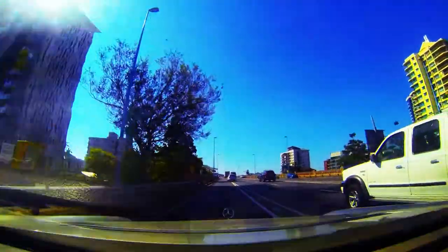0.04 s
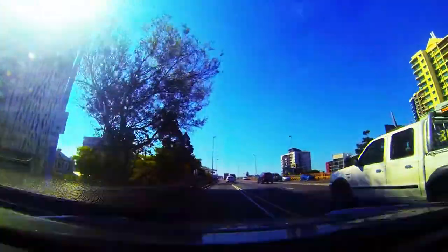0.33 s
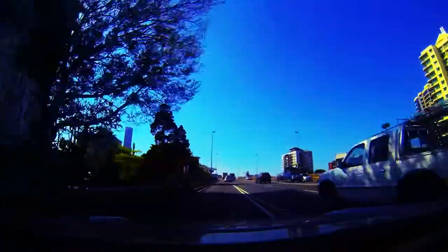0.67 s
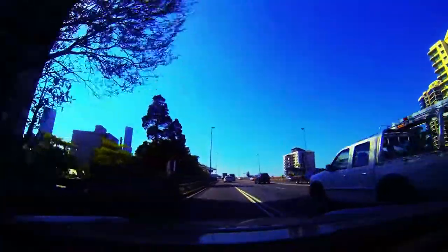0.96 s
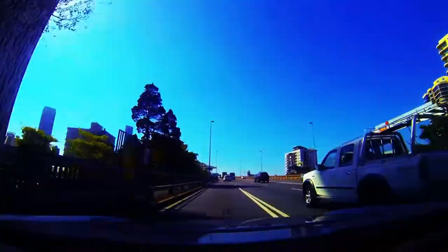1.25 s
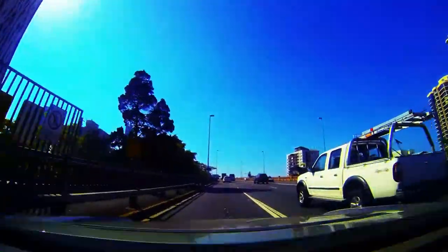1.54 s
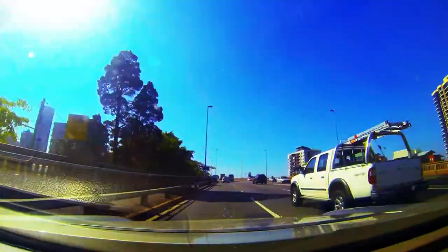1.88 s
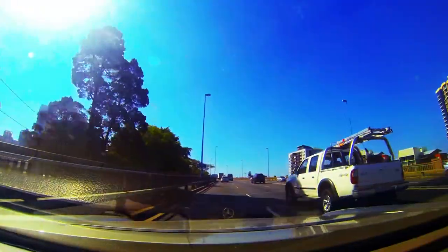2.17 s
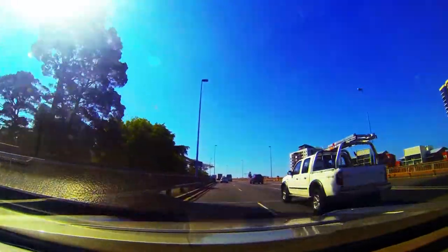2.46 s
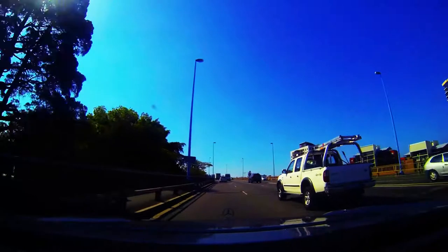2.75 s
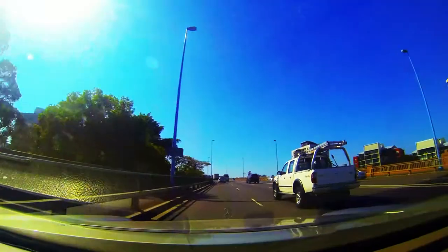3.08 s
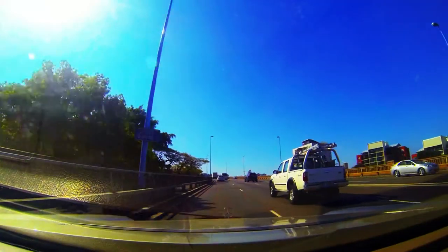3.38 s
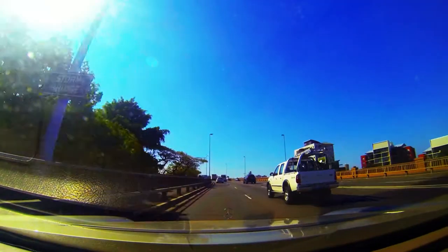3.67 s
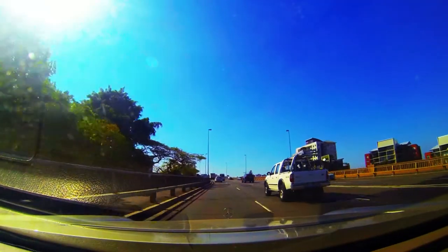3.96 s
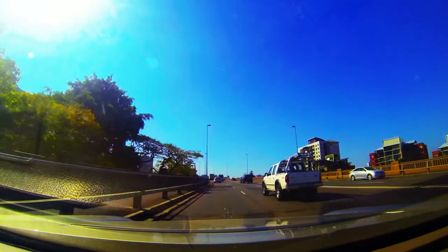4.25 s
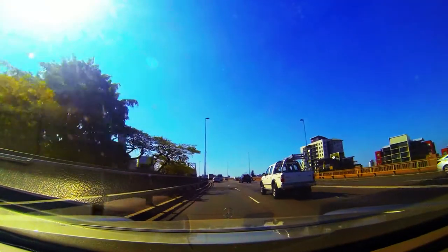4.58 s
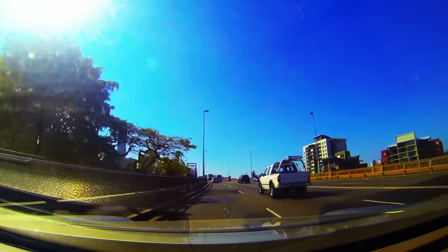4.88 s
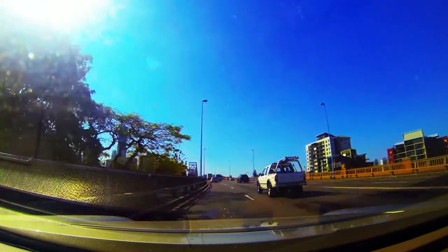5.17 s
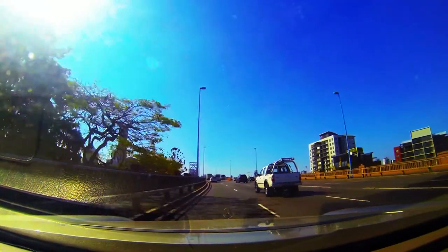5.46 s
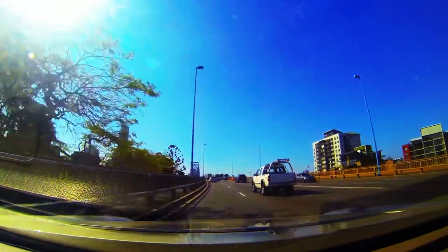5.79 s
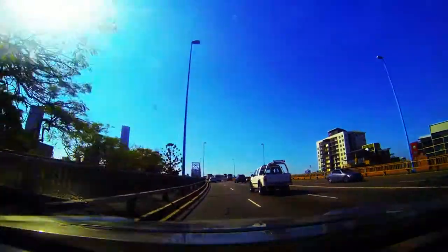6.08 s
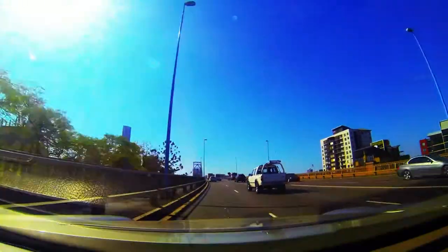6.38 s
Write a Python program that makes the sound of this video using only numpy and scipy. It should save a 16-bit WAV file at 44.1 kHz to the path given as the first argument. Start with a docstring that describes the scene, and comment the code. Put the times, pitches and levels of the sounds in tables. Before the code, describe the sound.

Inside a car moving along a multi-lane road, a deep, uneven rumble shakes the cabin under a steady tyre roar and a faint hiss of air. Road seams give soft thuds and make the trim knock, most clearly around the middle and again a little later, with a smaller bump near the end. The microphone sits at the windscreen, and the road noise dips briefly at stronger jolts.

```python
"""Car cabin on a multi-lane road

Inside the moving car, from a camera's microphone on the windscreen. Air hisses past the glass,
the tyres roar and drone, and the body shakes with a deep rumble. Road seams thud and make the
trim knock. The rumble drives the camera's gain control, so the roar ducks at strong jolts and
creeps back."""
import sys
import numpy as np
from scipy import signal
from scipy.fft import rfft, irfft
from scipy.io import wavfile
from scipy.ndimage import uniform_filter1d

SR = 44100
rng = np.random.default_rng(int(sys.argv[2]) if len(sys.argv) > 2 else 0)


def to_wav(sig):
    """Store sig (one row per channel, or 1-D mono) as 16-bit WAV at the path in sys.argv[1].

    Samples outside -1..1 are clipped; the rate is SR.
    """
    pcm = np.clip(np.atleast_2d(sig), -1, 1) * 32767
    pcm = np.round(pcm).astype(np.int16)
    wavfile.write(sys.argv[1], SR, pcm.T)  # frames by channels


N = 287973
T = np.arange(N) / SR

# Noise spectra: f/Hz, relative level/dB
HISS_SPECTRUM = [(900, -35.5), (1400, -1), (1900, 0.5), (2400, -7.5), (2770, -11), (3150, -10.5),
                 (4000, -19), (4900, -26), (6500, -27), (7800, -31.5), (9200, -28.5), (10200, -39),
                 (12000, -20.5), (14000, -91.5)]  # air at the glass
ROAR_SPECTRUM = [(44, -29.5), (75, -16), (108, -15.5), (183, -13), (246, -13), (338, -13.5), (500, -13.5),
                 (594, -13.5), (705, -19.5), (847, -13), (1040, -14.5), (1280, -24), (1400, -34.5),
                 (1820, -67), (3080, -120)]  # tread on asphalt
DRONE_SPECTRUM = [(45, -33.5), (72, 3), (105, -9), (135, -8.5), (165, -13), (210, -17.5), (400, -59.5)]  # road through the suspension
SWAY_SPECTRUM = [(5, -29.5), (14, -6), (21, -5.5), (25.5, 1.5), (31, -4), (42, -23), (70, -35.5),
                 (400, -110)]  # body on its mounts
BOOM_SPECTRUM = [(20, -36), (38, -1), (49, 3), (56, -0.5), (64, -10.5), (110, -39.5), (400, -110)]  # cabin air
SCUFF_SPECTRUM = [(100, -9.5), (300, 9.5), (1100, 1), (1500, -9), (4000, -30.5), (9000, -45.5),
                  (12000, -84)]
GAIN_RASP_SPECTRUM = [(3500, 2), (6000, -8.5), (9000, -12.5), (12000, -27.5)]

# Level curves along the drive: t/s, level/dB
ROAR_SWELL = [(0.0, 3), (0.35, -1), (0.7, 1), (0.92, -0.3), (1.12, -1.5), (1.3, -0.5), (1.6, -1), (2.2, 0),
              (2.48, 1.3), (2.6, 0.3), (2.81, -0.5), (2.865, 2), (2.95, 1), (3.05, 2.5), (3.25, -0.5),
              (3.45, 1), (3.62, -2.5), (3.8, -2.5), (4.15, 1), (4.7, 0.5), (5.0, 0.5), (5.3, 1.5),
              (5.41, 2.5), (5.48, -1), (5.56, 1), (5.68, -0.5), (5.8, 0), (6.1, 2), (6.5, -0.5)]  # follows the surface and the traffic alongside
DRONE_LEVEL = [(0.0, -32), (0.85, -37.5), (1.15, -37.5), (1.35, -32), (1.55, -35), (2.4, -39), (2.63, -34),
               (2.8, -39.5), (3.0, -30), (3.35, -32.5), (3.62, -32.5), (4.1, -37), (4.42, -33.5),
               (4.56, -23.5), (4.9, -35), (5.1, -29), (5.5, -32), (5.82, -26.5), (5.97, -31.5),
               (6.3, -27.5), (6.5, -44)]  # follows the surface
ROAD_ROUGHNESS = [(0.0, -20), (0.34, -9.5), (0.42, -15.5), (0.95, -18), (1.1, -16), (1.55, -26),
                  (1.9, -11.5), (2.2, -16.5), (2.38, -17), (2.8, -18.5), (3.28, -13.5), (3.4, -18),
                  (3.9, -10), (4.15, -19.5), (4.5, -15.5), (5.1, -24.5), (5.65, -16), (5.96, -17.5),
                  (6.2, -13)]  # steady shake of the body
BOOM_OVER_SWAY = [(0.0, 5), (0.7, -10), (1.3, -3), (1.75, -2.5), (2.05, -16.5), (2.5, -6), (2.8, -5),
                  (3.2, 1.5), (3.75, -14.5), (4.25, -7), (4.5, 0.5), (4.8, -8), (5.8, -0.5), (6.53, -8)]  # cabin boom relative to body sway

# Peaks and notches of the cabin: f/Hz, width/Hz, gain/dB
CABIN_BANDS = [(246.4, 25, 4.5), (586.6, 26, 3.5), (890, 14, -0.5), (964, 16, -3.5), (1098, 83, 2),
               (2756, 240, -3.5), (3160, 200, 1)]
# Wheels crossing seams: t/s, level/dB, f/Hz, length/s
SEAM_THUDS = [(1.108, -21.5, 79.4, 0.088), (2.569, -23, 84.5, 0.08), (2.918, -17, 94.9, 0.14),
              (3.111, -17, 125, 0.016), (3.135, -10.5, 50.8, 0.17), (4.514, -12, 85.2, 0.11),
              (4.517, -14, 104, 0.018), (4.552, -18, 125, 0.033), (4.668, -14.5, 76.8, 0.079),
              (6.056, -19, 99.7, 0.1), (6.135, -19, 125.5, 0.058), (6.24, -25.5, 147, 0.062)]
# Knocks of the trim: t/s, level/dB, main ring f/Hz, rise/s, t60/s, relative scuff level/dB
TRIM_KNOCKS = [(0.228, -19, 600, .002, 0.063, -18), (0.822, -24, 514, 0.0027, 0.08, -7),
               (.989, -24.5, 690, .002, 0.05, -9), (2.638, -21, 920, 0.0023, .04, -5),
               (2.941, -9.5, 660, 0.0024, 0.028, -30), (3.097, -15.5, 1040, .003, 0.084, -7),
               (3.112, -9, 1075, 0.0026, 0.04, -18), (3.1155, -3.5, 410, 0.002, 0.032, -8),
               (3.1165, -1.5, 630, 0.002, 0.027, -8), (3.142, -18, 247.7, 0.0038, 0.23, -14),
               (4.506, -7, 536, 0.0027, 0.042, -17), (4.519, -13, 470, 0.0035, 0.059, -6),
               (4.678, -11, 570, 0.0026, 0.034, -7), (4.6905, 8.3, 481, 0.0041, 0.033, -24),
               (4.714, -18.5, 513, 0.0021, 0.1, -8), (6.248, -10.5, 510, .002, 0.058, -14),
               (6.252, -9.5, 284, 0.0025, 0.064, -14.5), (6.269, -15.5, 464, 0.0026, 0.046, -10)]
# Panels that ring with every knock: f/Hz, relative level/dB, t60/s
PANEL_MODES = [(249.5, -27, 0.33), (361, -21, 0.083), (910, -30, 0.024), (1770, -32.5, 0.05)]
# Bumps that jolt the body, which then settles: t/s, peak level/dB, t60/s
BODY_JOLTS = [(0.01, -7, 0.091), (0.081, -5, 0.59), (0.203, -4, 0.3), (0.27, -5, 0.19), (0.303, -4.5, 0.2),
              (0.347, -4.5, 0.27), (0.612, -5, 0.17), (0.732, -6.5, 0.29), (0.861, -9, 0.38),
              (0.963, -9, 0.17), (1.164, -3.5, 0.3), (1.36, -3.5, 0.44), (1.467, -6.5, 0.098),
              (1.634, -6, 0.75), (1.81, -14, 0.13), (2.01, -7, 1.5), (2.187, -5, 0.35), (2.607, -7.5, 0.17),
              (2.659, -4.5, 0.17), (2.832, -10, 0.4), (2.888, -3.5, 1.8), (3.123, -7.5, 0.72),
              (3.167, -10, 0.28), (3.249, -5.5, 0.28), (3.474, -8.5, 0.15), (3.645, 0.7, 1.55),
              (4.201, -7.5, 5.3), (4.348, 0, 1.1), (4.531, -8.5, 0.16), (4.837, -6.5, 1.76),
              (5.212, -6.5, 0.77), (5.315, -5.5, 0.58), (5.431, -5.5, 0.45), (5.58, -5.5, 0.82),
              (5.84, -4, 0.21), (6.096, -5.5, 0.91), (6.356, 1.3, 0.15)]
# Brief dips in the rumble, and a few slight lifts: t/s, gain/dB
RUMBLE_LULLS = [(0.24, -10), (0.415, -11), (0.775, 1), (1.07, -9), (1.22, -3), (1.54, 0.5), (2.47, 0.5),
                (2.74, -1.5), (3.73, -9.5), (5.07, -8.5), (5.885, -8), (6.281, -2), (6.41, 1.5)]


def amp(db):
    return 10 ** (np.asarray(db) / 20)


def unit_rms(x):
    return x / np.sqrt(np.mean(x ** 2) + 1e-20)


def curve(points):
    return np.interp(T, *np.transpose(points))


def add(mix, start_s, sound):
    part = mix[round(start_s * SR):][:len(sound)]
    part += sound[:len(part)]


def noise(spectrum):
    """Noise of rms 1, coloured by a spectrum table."""
    hz, db = np.transpose(spectrum)
    colour = amp(np.interp(np.log(np.fft.rfftfreq(N, 1 / SR) + 1), np.log(hz + 1), db))
    return unit_rms(irfft(rfft(rng.standard_normal(N)) * colour, N))


def drift(rate_hz):
    """Random wander of rms 1, up to about the given rate."""
    rolloff = np.exp(-(np.fft.rfftfreq(N, 1 / SR) / rate_hz) ** 2)
    return unit_rms(irfft(rfft(rng.standard_normal(N)) * rolloff, N))


def air_hiss(level_db=-42.5, flutter_db=0.8, swell_share=0.35):
    """Air and the higher tyre noise leak in past the glass, partly following the roar's swell."""
    swell_db = swell_share * curve(ROAR_SWELL)
    return noise(HISS_SPECTRUM) * amp(level_db + swell_db + flutter_db * drift(44))


def tyre_drone(waver_db=2):
    """Coarse asphalt drums up through the tyres and suspension, wavering from patch to patch."""
    return noise(DRONE_SPECTRUM) * amp(curve(DRONE_LEVEL) + waver_db * drift(11))


def tyre_roar(level_db=-30.5, grain_db=0.47):
    """Outside, the tread roars on the asphalt, unevenly as its grain changes."""
    return noise(ROAR_SPECTRUM) * amp(level_db + curve(ROAR_SWELL) + grain_db * drift(25))


def cabin_colour(x):
    """Standing waves between glass, roof and dashboard colour the noise at the microphone."""
    hz = np.fft.rfftfreq(N, 1 / SR)
    colour_db = sum(db * np.exp(-(2 * (hz - centre) / width) ** 2) for centre, width, db in CABIN_BANDS)
    return irfft(rfft(x) * amp(colour_db), N)


def seam_thuds():
    """Each seam under the wheels sets the cabin air booming for a few cycles."""
    out = np.zeros(N)
    for start_s, db, hz, length_s in SEAM_THUDS:
        t = np.arange(0, length_s, 1 / SR)
        envelope = amp(db) * np.sin(np.pi * t / length_s)
        add(out, start_s, envelope * np.sin(2 * np.pi * hz * t))
    return out


def trim_knocks():
    """Padded trim knocks close by: a short main ring, the shared panels and a dull scuff."""
    out, t = np.zeros(N), np.arange(SR // 4) / SR
    scuff_noise = noise(SCUFF_SPECTRUM)
    for start_s, db, main_hz, rise_s, main_t60, scuff_db in TRIM_KNOCKS:
        modes = [(main_hz, 0, main_t60)] + PANEL_MODES
        ring = sum(amp(mode_db - 60 * t / t60) * np.sin(2 * np.pi * hz * t) for hz, mode_db, t60 in modes)
        scuff = amp(scuff_db - 60 * t / main_t60) * np.roll(scuff_noise, -round(start_s * SR))[:len(t)]
        attack = (1 - np.exp(-t / rise_s)) ** 2  # rounded by the soft contact
        add(out, start_s, amp(db) * attack * (ring + scuff))
    return out


def shake_strength(aftershake_db=-6, build_s=0.013, lull_half_s=0.031):
    """How hard the body moves: the road's steady shake plus each jolt's dying shake, with lulls."""
    power = amp(curve(ROAD_ROUGHNESS)) ** 2
    for at_s, peak_db, t60 in BODY_JOLTS:
        build = np.exp(np.minimum(T - at_s, 0) / build_s)
        settle = amp(peak_db + aftershake_db - 60 * np.maximum(T - at_s, 0) / t60)
        power += (build * settle) ** 2
    lull_db = sum(db * np.exp(-((T - at_s) / lull_half_s) ** 2) for at_s, db in RUMBLE_LULLS)
    return np.sqrt(power) * amp(lull_db)


def body_rumble(jolt_s=0.0077, throb_db=1.7):
    """All round the microphone the body sways and the cabin air booms, as the road shakes them."""
    swing = noise(SWAY_SPECTRUM) + noise(BOOM_SPECTRUM) * amp(curve(BOOM_OVER_SWAY))
    envelope = np.sqrt(uniform_filter1d(abs(signal.hilbert(swing)) ** 2, size=1300))
    even_swing = unit_rms(swing / envelope)
    out = even_swing * shake_strength() * amp(throb_db * drift(10.3))
    for at_s, peak_db, _ in BODY_JOLTS:  # a jolt takes over one swing and drives it to its own peak
        push = np.exp(-(2 * (T - at_s) / jolt_s) ** 2)
        peak = np.sign(even_swing[round(at_s * SR)]) * amp(peak_db)
        out += push * (peak - out)
    return out


def gain_control(x, target_db=-11.5, max_gain_db=4, recovery_db_per_s=62, attack_s=0.0036):
    """The camera follows the rumble's crests: its gain falls in milliseconds and recovers steadily."""
    crest_db = 20 * np.log10(abs(uniform_filter1d(x, size=80)) + 1e-9)
    recovery_db = recovery_db_per_s * T
    held_db = np.maximum.accumulate(crest_db + recovery_db) - recovery_db
    wanted_db = np.minimum(target_db - held_db, max_gain_db)
    pole = np.exp(-1 / (attack_s * SR))
    gain_db = signal.lfilter([1 - pole], [1, -pole], wanted_db)
    falling = np.tanh(np.maximum(gain_db - wanted_db, 0) / 1.3)
    rasp_db = 0.088 * falling * noise(GAIN_RASP_SPECTRUM)  # uneven steps: each fall ticks faintly
    return x * amp(gain_db + rasp_db)


def scene():
    """Rumble, road noise and bumps as they reach the windscreen, in mono."""
    rumble = body_rumble()
    road_noise = cabin_colour(tyre_roar() + air_hiss() + tyre_drone())
    return (rumble + road_noise + seam_thuds() + trim_knocks())[None]


def record(dry, low_hz=9, high_hz=9800, band_limit_hz=12200):
    """The camera's chain: gain control, roll-off of bass and treble, then a steep band limit."""
    x = gain_control(dry[0]) * signal.windows.tukey(N, 0.002)  # brief fade in and out
    x = signal.sosfilt(signal.butter(2, low_hz, "highpass", fs=SR, output="sos"), x)
    x = signal.sosfilt(signal.butter(10, high_hz, fs=SR, output="sos"), x)
    lowpass = signal.firwin(255, band_limit_hz, window=("kaiser", 8), fs=SR)
    return signal.oaconvolve(x, lowpass, "same")[None]


dry = scene()
out = record(dry)
to_wav(out)
```